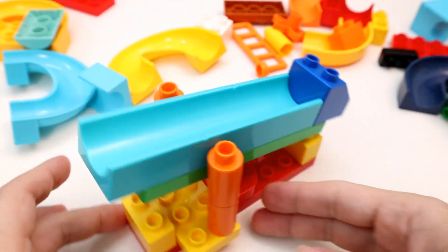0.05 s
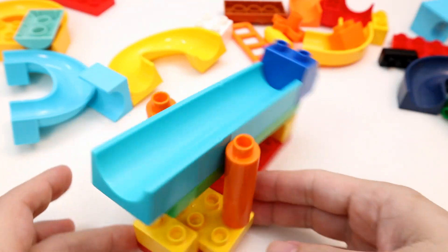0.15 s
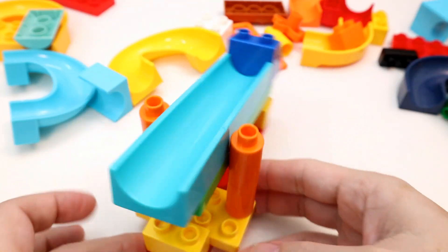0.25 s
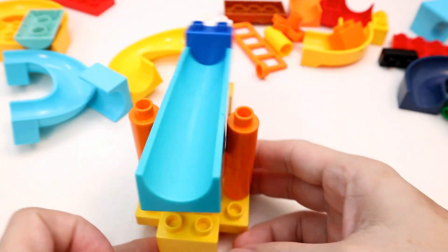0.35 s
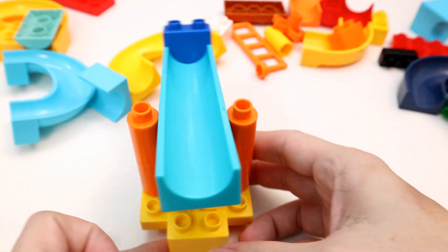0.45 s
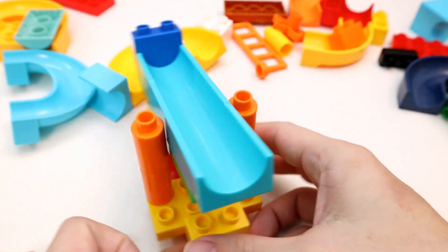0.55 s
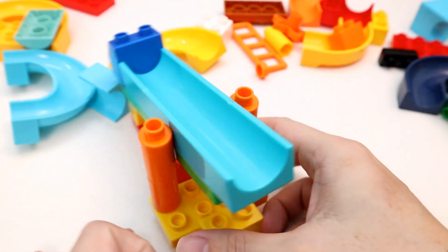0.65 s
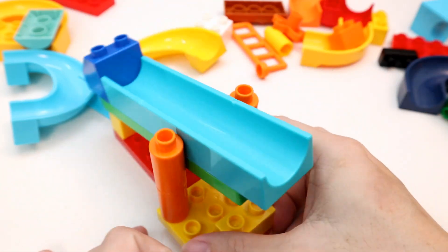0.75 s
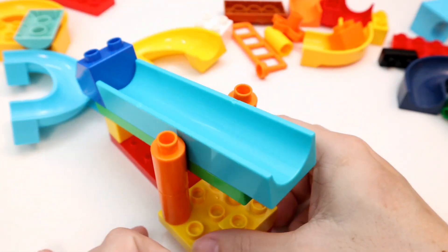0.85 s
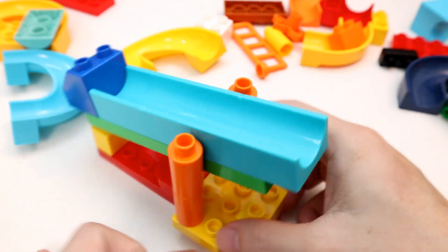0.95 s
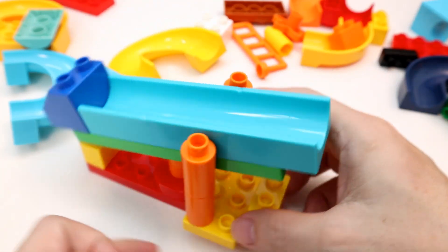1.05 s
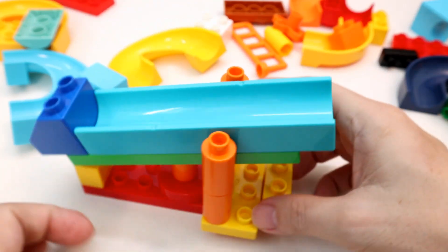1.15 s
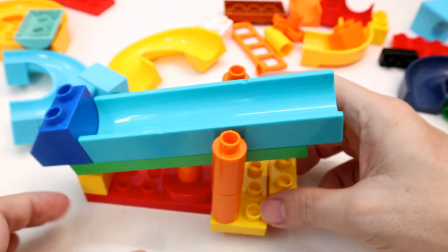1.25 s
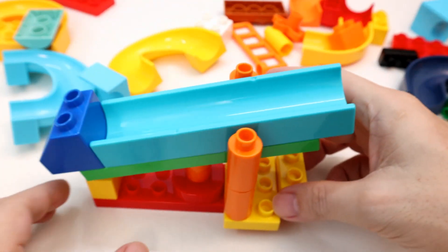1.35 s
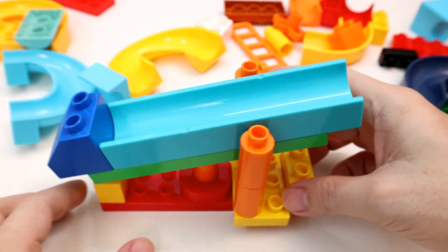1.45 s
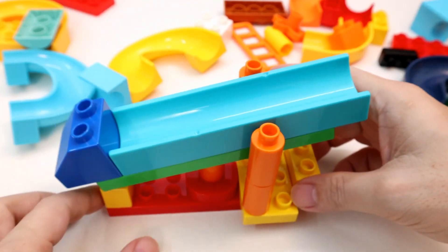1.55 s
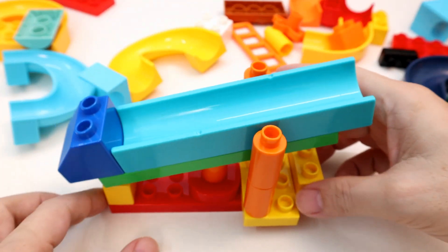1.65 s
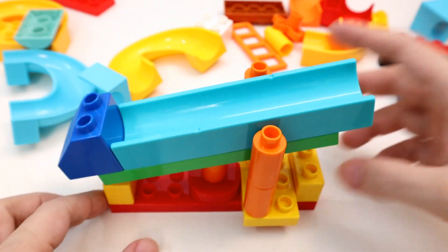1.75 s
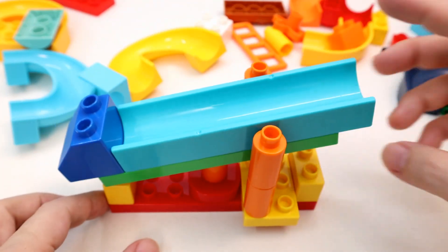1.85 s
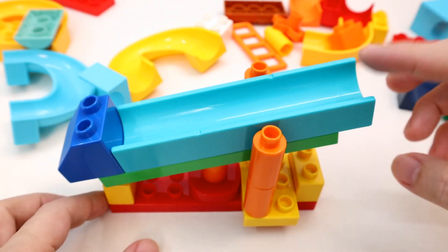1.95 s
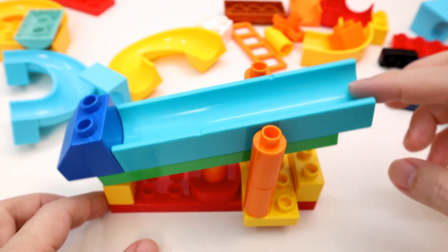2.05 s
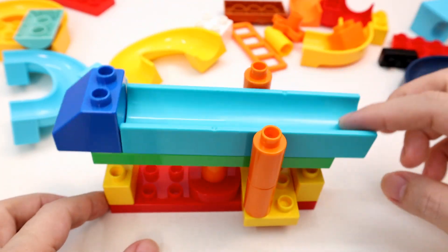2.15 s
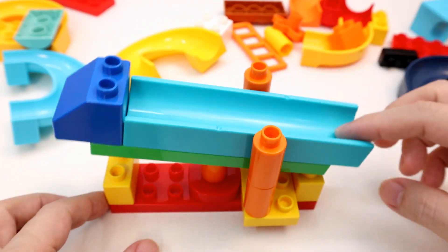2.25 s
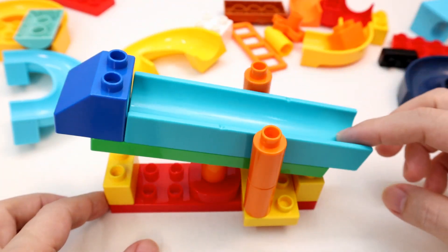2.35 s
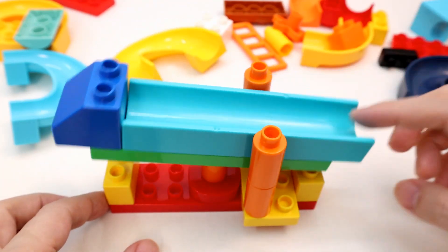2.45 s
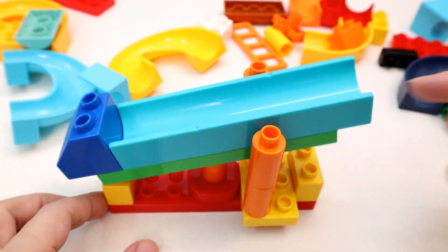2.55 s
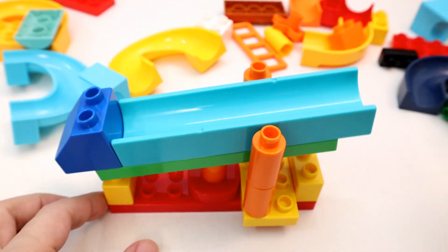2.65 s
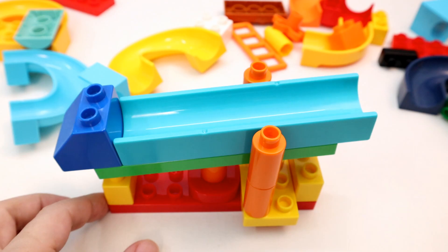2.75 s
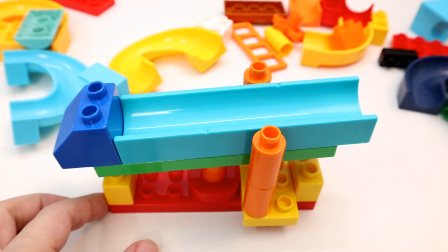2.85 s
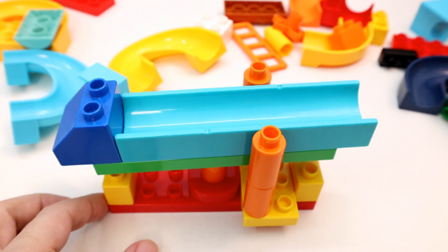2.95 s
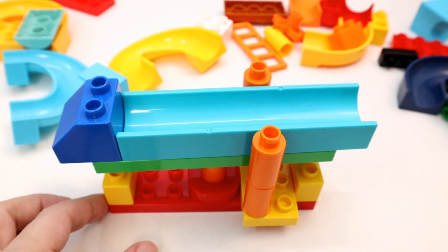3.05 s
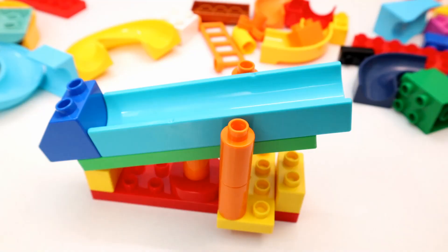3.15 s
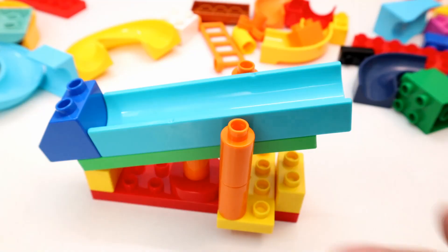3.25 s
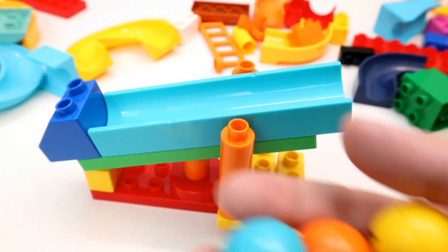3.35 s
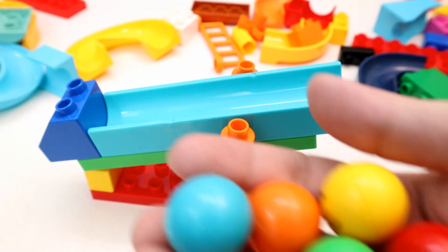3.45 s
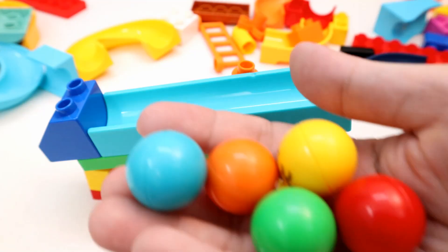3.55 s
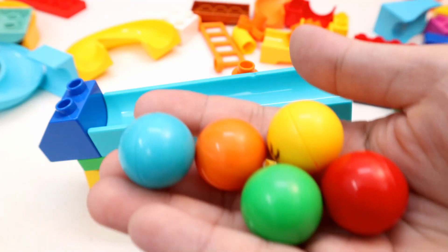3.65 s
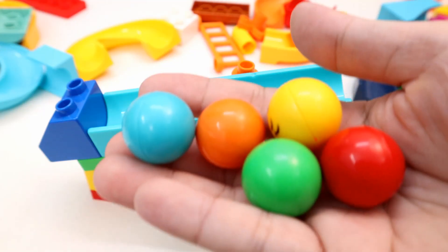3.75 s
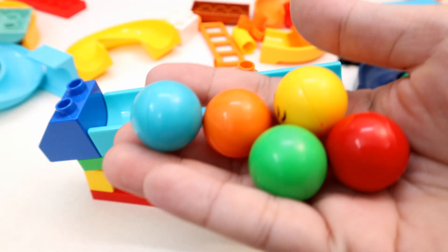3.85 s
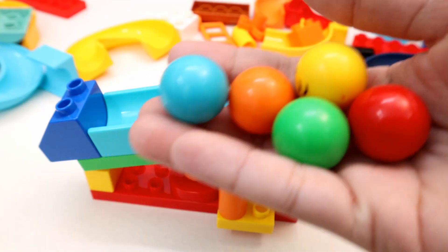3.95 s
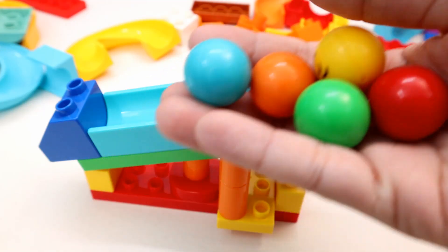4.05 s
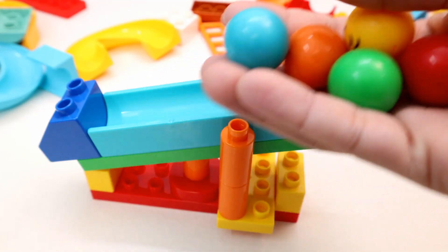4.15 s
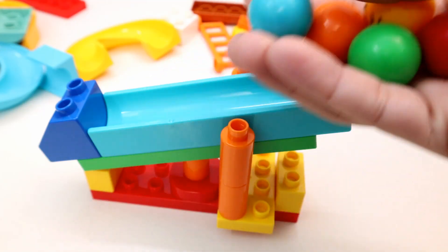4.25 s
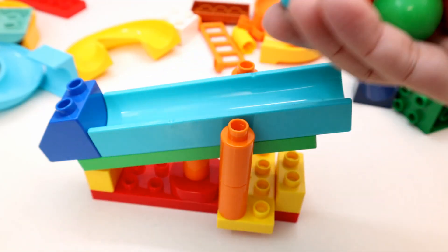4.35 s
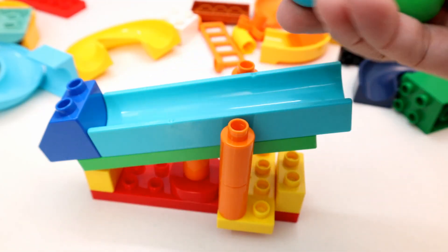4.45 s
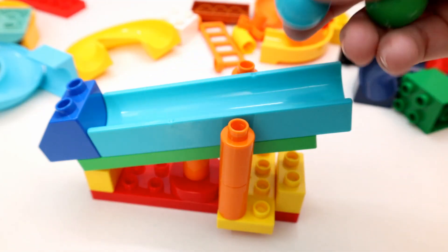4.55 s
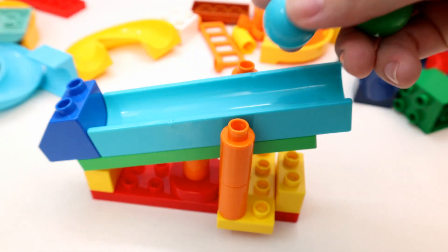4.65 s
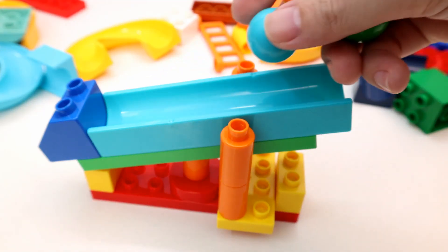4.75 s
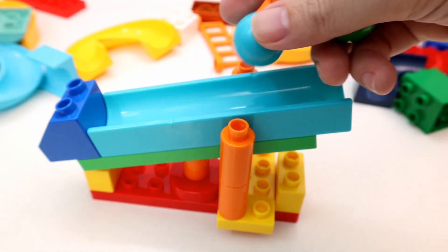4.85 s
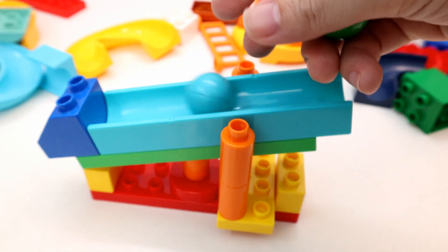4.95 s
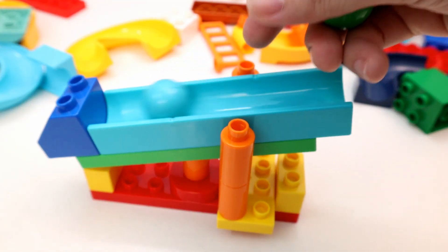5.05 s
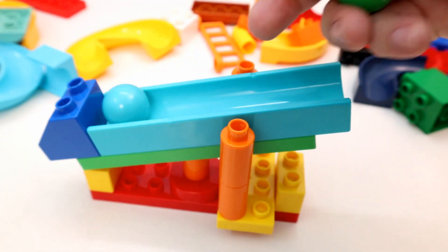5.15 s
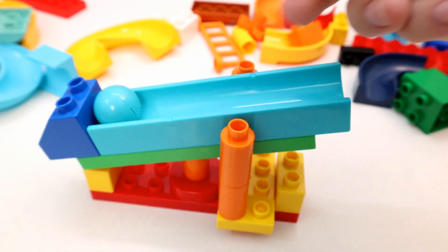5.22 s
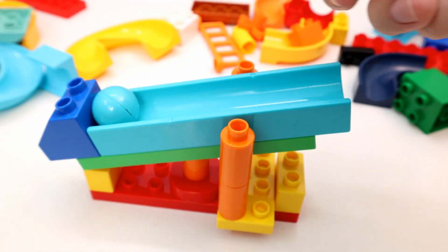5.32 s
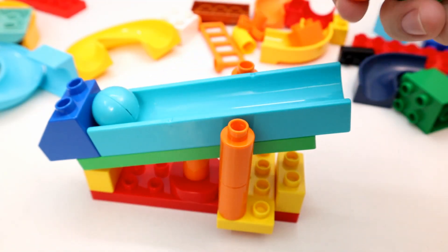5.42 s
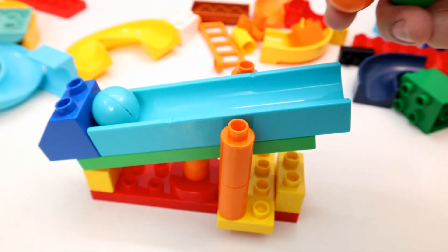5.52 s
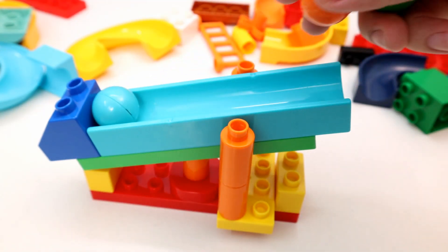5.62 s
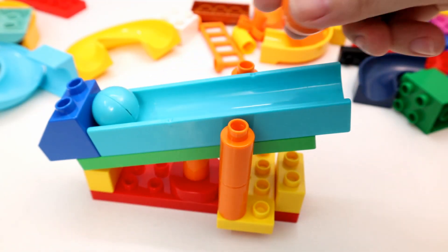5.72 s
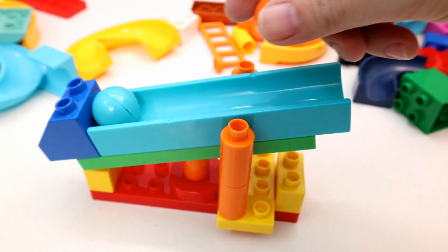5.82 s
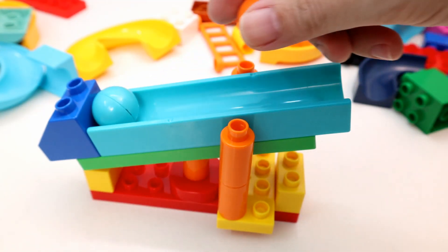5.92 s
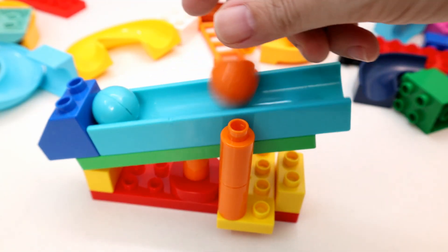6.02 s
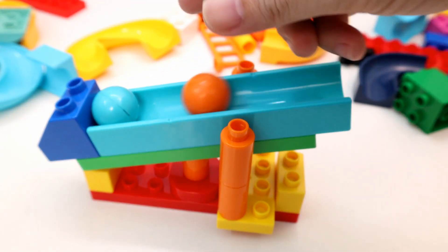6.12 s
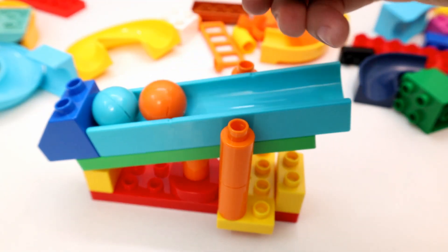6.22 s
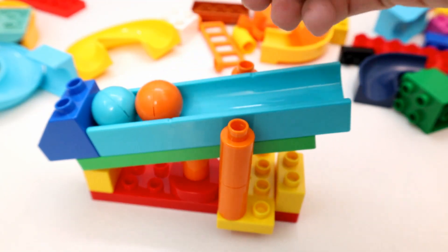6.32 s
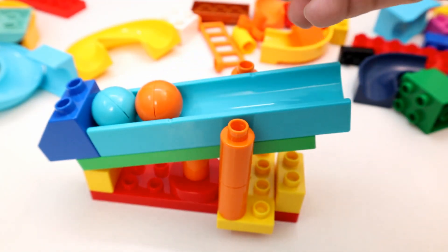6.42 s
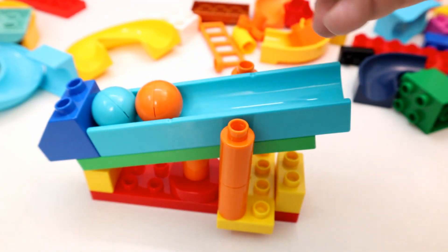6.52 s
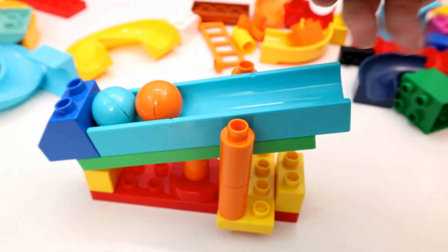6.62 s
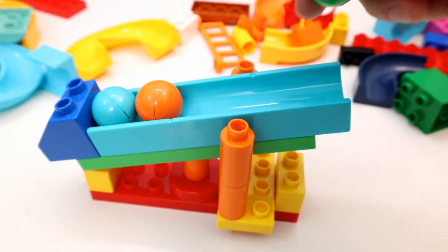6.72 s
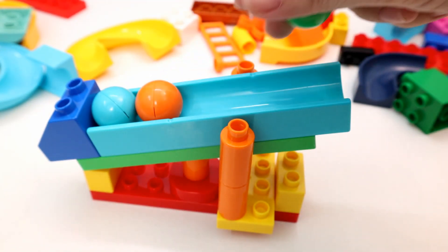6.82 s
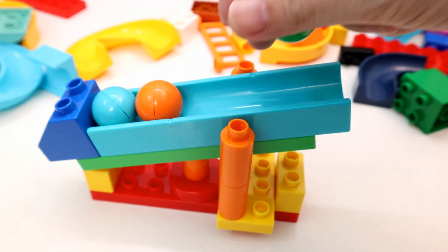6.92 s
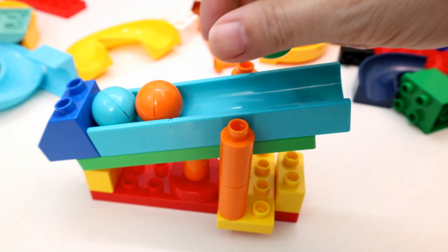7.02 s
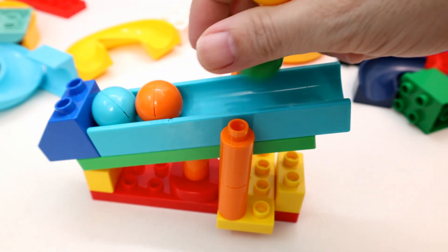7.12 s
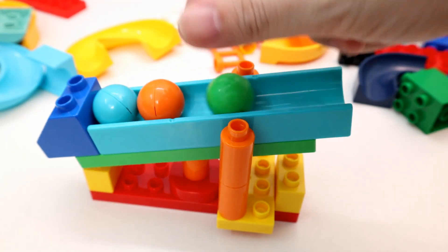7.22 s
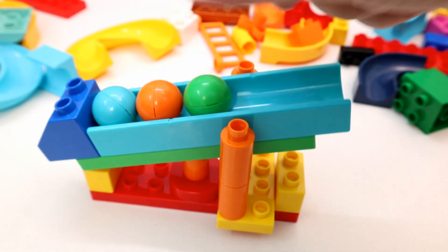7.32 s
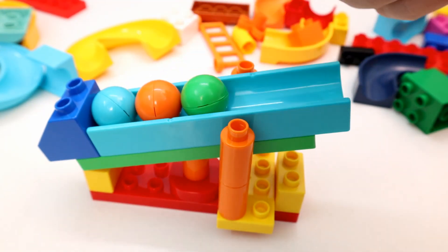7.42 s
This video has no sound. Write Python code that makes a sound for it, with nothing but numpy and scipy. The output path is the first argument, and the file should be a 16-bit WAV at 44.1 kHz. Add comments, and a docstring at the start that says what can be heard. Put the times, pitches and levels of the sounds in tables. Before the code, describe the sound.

A plastic block seesaw is turned on a table, its base scraping with a brief high squeal. Light knocks and faint creaks follow, then a few sharper clacks as the chute tips. After a quiet pause, three hollow plastic balls drop into the chute about a second apart, each bouncing with a bright, rattling clatter. The sound is close, in a small quiet room with faint hiss and low rumble.

```python
"""A small quiet room, at a table: a hand turns a plastic block seesaw and tips its chute.
The base scrapes by friction and squeals by stick-slip; blocks knock, fingers and joints creak.
Then hollow balls drop into the chute, bounce, roll and knock together, their shells ringing.
Each blow cracks, rings the chute, thumps the table and rattles the loose joints.
Near walls add a short tail; room hiss and a low rumble lie underneath."""
import sys
import numpy as np
from scipy import signal
from scipy.fft import rfft, irfft
from scipy.io import wavfile
from scipy.ndimage import uniform_filter1d

SR = 44100
rng = np.random.default_rng(int(sys.argv[2]) if len(sys.argv) > 2 else 0)


def dump(signal):
    """Clip the signal to [-1, 1] and save it as 16-bit WAV at the path in sys.argv[1]."""
    limited = np.clip(np.atleast_2d(signal).T, -1, 1)
    pcm = np.round(limited * 32767).astype(np.int16)
    wavfile.write(sys.argv[1], SR, pcm)


N = 329859


def undb(db):
    """dB to gain."""
    return 10 ** (np.asarray(db) / 20)


def unit_rms(x):
    """Scale to rms 1."""
    return x / np.sqrt(np.mean(x ** 2))


def curves(rows):
    """Table columns, linearly interpolated over time."""
    time_s, *columns = np.transpose(rows)
    return [np.interp(np.arange(N) / SR, time_s, column) for column in columns]


def colour(x, points):
    """Filter by (freq_hz, gain_db) points."""
    hz, db = np.transpose(points)
    n = x.shape[-1]
    bins_hz = np.maximum(np.arange(n // 2 + 1) * SR / n, 1)
    return irfft(rfft(x) * undb(np.interp(np.log(bins_hz), np.log(hz), db)), n)


def band(x, hz, width_hz):
    """Resonator applied twice; unity gain at centre."""
    b, a = signal.iirpeak(min(hz, SR / 2.5), hz / width_hz, fs=SR)
    return signal.lfilter(b, a, signal.lfilter(b, a, x))


def wander(rate_hz):
    """Smoothed random steps, rms 1."""
    hold = int(SR / rate_hz)
    steps = np.repeat(rng.standard_normal(N // hold + 1), hold)
    return unit_rms(uniform_filter1d(uniform_filter1d(steps, hold), hold)[:N])


def panned(x, pan_db):
    """Stereo; pan_db is left minus right."""
    return x * undb(np.array([[pan_db], [-pan_db]]) / 2)


def add_at(out, start_s, x):
    """Mix x into out from start_s."""
    start = int(start_s * SR)
    span = out[..., start:start + x.shape[-1]]
    span += x[..., :span.shape[-1]]


# freq_hz, density_db
AIR_SPECTRUM = [(53, -33.5), (90, -5.5), (111, -6), (130, -10), (190, -10), (221, -9.5), (251, -8),
                (325, -14.5), (532, -16.5), (870, -22), (2650, -27), (12100, -48.5), (15000, -77.5)]
# Stereo width of the air: freq_hz, side_minus_mid_db
AIR_WIDTH = [(60, -21.5), (110, -11.5), (200, -5.5), (380, -0.5), (690, 3), (1280, 4.5), (2360, 2.5),
             (4360, 5), (8040, 4), (14800, -10.5)]


def air(level_db=-55):
    """Steady room hiss and hum, wider in the treble."""
    mid, side = colour(rng.standard_normal((2, N)), AIR_SPECTRUM)
    side = colour(side, AIR_WIDTH)
    return np.array([mid + side, mid - side]) * undb(level_db) / mid.std()


# Hand and table rumble: time_s, level_db
RUMBLE_LEVELS = [(0.0, -51), (.58, -61), (1.56, -56.5), (2.25, -50.5), (2.44, -62), (2.79, -45),
                 (2.91, -57), (3.25, -57.5), (3.55, -50), (3.8, -56.5), (4.23, -53.5), (4.6, -59),
                 (5.1, -58.5), (5.27, -47), (5.4, -63), (6.06, -57), (7.23, -57.5), (7.48, -46)]


def rumble():
    """Low noise from hands and table."""
    noise = band(rng.standard_normal(N), hz=62, width_hz=50)
    return unit_rms(noise) * undb(curves(RUMBLE_LEVELS)[0])


# Base sliding on the table: time_s, scrape_db, body_db
DRAG_LEVELS = [(0.0, -50.5, -54), (.06, -53, -46.5), (.24, -49.5, -57), (.28, -35.5, -37),
               (.35, -38, -36.5), (.44, -32, -43.5), (.57, -41, -48), (.86, -51, -50), (.95, -53.5, -70),
               (1.005, -79, -77), (1.025, -50, -44.5), (1.22, -55, -48.5), (1.31, -57.5, -50),
               (1.6, -46.5, -46.5), (1.75, -54.5, -50.5), (1.87, -73, -51.5), (2.01, -68.5, -60),
               (2.1, -84, -58)]
# Base resonances, three ranges: freq_hz, width_hz, gain_db
BODY_BANDS = [(259.2, 60, 5), (510, 100, -2), (990, 610, -11), (1430, 90, -2), (832.3, 2130, -3.5)]
SCRAPE_BANDS = [(2370, 120, -5), (2600, 330, 6.5), (2980, 388, -3), (3755, 320, -8.5), (2630, 2200, -7)]
HISS_BANDS = [(4800, 1500, 5.5), (6500, 2700, -9.5), (9515, 4400, -13)]


def drag(hiss_db=-16.5):
    """Gritty friction excites the base; resonances come and go as the grip moves."""
    scrape_db, body_db = curves(DRAG_LEVELS)
    layers = [(scrape_db, SCRAPE_BANDS), (body_db, BODY_BANDS), (scrape_db + hiss_db, HISS_BANDS)]
    out = np.zeros(N)
    for level_db, bands in layers:
        grit = rng.standard_normal(N) * undb(2 * rng.exponential(size=N) + 2.58 * wander(44))
        base = sum(undb(db + 2.2 * wander(18)) * band(grit, hz, width) for hz, width, db in bands)
        out += undb(level_db) * unit_rms(base)
    sliding = np.clip((DRAG_LEVELS[-1][0] - np.arange(N) / SR) / 0.033, 0, 1)
    return out * sliding


def ring(modes, t, scatter_db, detune, attack_s):
    """Struck modes, peak 1; strengths vary with where the blow lands."""
    hz, db, t60_s = np.transpose(modes)[:, :, None]
    level_draw, pitch_draw = rng.standard_normal((2, len(modes), 1))
    envelopes = undb(db + scatter_db * level_draw - 60 * t / t60_s)
    partials = envelopes * np.sin(2 * np.pi * hz * (1 + detune * pitch_draw) * t)
    x = partials.sum(0) * (1 - np.exp(-t / attack_s))
    return x / np.abs(x).max()


# Loose joints: freq_hz, density_db
RATTLE_SPECTRUM = [(88, -38.5), (150, -7.5), (252, -1.5), (601, -0.5), (687, 3), (818, -4.5), (883, 2),
                   (1130, 1), (1870, -5.5), (5100, -28.5), (15000, -60)]


def rattle(t, noise, chute, ring_db, snap_db, t60_s=0.34):
    """Joints chatter in bursts and ring the chute anew; more treble snap gives a brighter rattle."""
    bursts, drive = rng.standard_normal((2, len(t)))
    chatter = undb(2.76 * unit_rms(uniform_filter1d(bursts, size=90)))
    rung = unit_rms(signal.fftconvolve(drive, chute * undb(-60 * t / 0.069))[:len(t)])
    joints = unit_rms(colour(noise, RATTLE_SPECTRUM)) + undb(-3 + 0.83 * ring_db) * rung
    tilt = [(1000, 0.0089), (10000, 0.9 * (snap_db + 29.5))]
    envelope = undb(-60 * t / t60_s) * np.minimum(t / 0.0014, 1)
    return colour(joints * chatter, tilt) * envelope


# Chute and table modes: freq_hz, level_db, t60_s
CHUTE_MODES = [(868, -16.5, 0.096), (1200, -18, 0.068), (1290, -4, 0.036), (1556, -9, 0.022),
               (1743, -13, 0.031), (1830.4, -4, .11), (1870, -0.5, 0.081), (2136, -8, 0.19),
               (2680, -4.5, 0.061), (2850, -5.5, 0.047), (3556, -11, 0.035), (4080, -15, .05),
               (5147, -12.5, 0.036), (5844, -26.5, 0.046)]
TABLE_MODES = [(70, -10, 0.07), (100, -1.5, 0.15), (159.5, -11.5, 0.15), (246.1, -0.5, 0.22),
               (289.1, -7.5, 0.32), (339, -8, 0.26), (462.5, -2.5, 0.084), (669.4, -9.5, 0.097)]


def contact(t, crack_hz, thump_db, snap_db, ring_db, damping, snap_hz, rattle_db):
    """One blow: crack, treble snap, chute ring, joint rattle, table thump."""
    mono_noise = rng.standard_normal(len(t))
    stereo_noise = rng.standard_normal((2, len(t)))
    snap_hz *= 1 + 0.091 * rng.standard_normal()
    impulse = (t == 0) * 1.2
    crack = band(impulse + mono_noise * np.exp(-t / 0.0012), crack_hz, 0.96 * crack_hz)
    snap = band(impulse + stereo_noise * np.exp(-t / 0.0054), snap_hz, 0.48 * snap_hz)
    snap *= undb(snap_db) / np.abs(snap).max()
    chute = ring(CHUTE_MODES, t, scatter_db=5, detune=0.006, attack_s=0.0007)
    joints = undb(rattle_db) * rattle(t, mono_noise + 0.46 * stereo_noise, chute, ring_db, snap_db)
    thump = undb(thump_db) * ring(TABLE_MODES, t, scatter_db=4.5, detune=0.043, attack_s=0.0012)
    choke = undb(-60 * t * damping / 0.04)  # a resting ball or hand cuts the ring short
    return crack / np.abs(crack).max() + choke * (undb(ring_db) * chute + joints + snap) + thump


# Block knocks: start_s, level_db, crack_hz, thump_db, snap_db, ring_db
BLOCK_BLOWS = [(0.027, -24.5, 1140, -3.5, -34.5, -11), (0.035, -28, 970, -15, -32.5, -0.5),
               (0.102, -29.5, 735, -19, -21, -15), (0.265, -20, 2400, -9, -1, -12),
               (0.287, -13, 1330, -25.5, -35.5, -1), (0.295, -15, 1940, -13.5, -34.5, -11),
               (0.36, -15.5, 2600, -19.5, -25.5, -1.5), (0.534, -28, 2370, -32.5, -24, 8.5),
               (1.03, -32.5, 940, -27, -25, -13), (1.051, -35.5, 1060, -1, -18, -7),
               (1.176, -24, 865, -9, -40, -12), (1.22, -21.5, 2830, -24, -5, -2.5),
               (1.248, -26.5, 784, -13.5, -41, -17), (1.584, -35.5, 2610, -8.5, -2, -18),
               (1.729, -32, 1870, -2.5, -20, 0.5), (1.826, -32, 780, -4.5, -35, -23),
               (1.86, -37.5, 1075, 9.5, -29, -8), (1.916, -27.5, 830, -12, -66, -27),
               (1.954, -31.5, 890, -4.5, -42, -26), (2.005, -41, 1784, -1, -28, 10.5),
               (2.208, -30, 2070, -6.5, -16, -3), (2.248, -38, 2790, -3.5, -12, -5),
               (2.278, -29.5, 605, 7.5, -23, -4.5), (2.446, -16, 2770, -5.5, -38.5, -4),
               (2.653, -19.5, 1760, 3.5, -15.5, -10), (2.669, -20.5, 1430, -4.5, -9, -6),
               (2.703, -1.5, 2250, -17, -13.5, -11.5), (2.736, -10.5, 665, -6, -11, -1.5),
               (3.164, -54.5, 604, 11, -27, -6), (3.243, -53, 935, 2, -24, -12),
               (4.153, -47, 2590, -18, -11, -7), (4.281, -47.5, 940, -6, -14.5, -8),
               (4.948, -47, 1503, -8, -18, -7), (5.725, -49.5, 890, -6, -21, 1)]
# Dulling by the hand: freq_hz, gain_db
BLOCK_EQ = [(3000, -0.5), (6000, -2), (12000, -9.5)]


def blocks():
    """Hand-held blocks knock as the toy is turned and tipped."""
    t = np.arange(int(0.4 * SR)) / SR
    out = np.zeros((2, N))
    for start_s, level_db, crack_hz, thump_db, snap_db, ring_db in BLOCK_BLOWS:
        knock = contact(t, crack_hz, thump_db, snap_db, ring_db,
                        damping=0.31, snap_hz=3700, rattle_db=-11)
        add_at(out, start_s, panned(undb(level_db) * knock, pan_db=rng.normal(-0.15, 1)))
    return colour(out, BLOCK_EQ)


# Base squeal: time_s, pitch_hz, level_db
SQUEAL_PATH = [(.3, 2540, -39), (.326, 2550, -27.5), (.36, 2605, -13), (.374, 2580, -29.5),
               (.398, 2520, -37), (.41, 2525, -19), (.454, 2548, -8.5), (.47, 2510, -20.5),
               (.48, 2510, -15.5), (.497, 2490, -25.5), (.52, 2480, -40), (.548, 2480, -46),
               (.558, 2500, -20.5), (.568, 2480, -44), (.6, 2450, -55)]


def squeal(neighbour_db=-13.5):
    """Stick-slip locks on a base mode, grows and slips free; a lower mode beats with it."""
    t = np.arange(N) / SR
    pitch_hz, level_db = curves(SQUEAL_PATH)
    gripping = np.clip(np.minimum(t - SQUEAL_PATH[0][0], SQUEAL_PATH[-1][0] - t) / 0.01, 0, 1)
    phase = 2 * np.pi * np.cumsum(pitch_hz + 18 * wander(120)) / SR
    rasp = wander(500)  # uneven slips smear the overtones
    overtones = rasp * (undb(-31) * np.sin(2 * phase) + undb(-48.5) * np.sin(3 * phase))
    neighbour = undb(neighbour_db) * np.sin(0.925 * phase)
    envelope = np.sqrt(2) * gripping * undb(level_db + 1.2 * wander(170))
    return panned(envelope * (np.sin(phase) + neighbour + overtones), pan_db=3.7)


# Finger and joint creaks: start_s, length_s, pitch_hz, level_db
CREAK_EVENTS = [(1.06, 0.039, 1200, -59), (1.35, 0.044, 487, -45.5), (1.495, .042, 993, -43),
                (1.697, 0.026, 924, -46.5), (1.806, 0.035, 730, -45.5), (1.838, 0.038, 1050, -44),
                (2.025, 0.028, 1860, -55)]


def creaks(slips_per_s=260):
    """Uneven slips briefly ring a small resonance."""
    t = np.arange(int(0.08 * SR)) / SR
    out = np.zeros(N)
    for start_s, length_s, pitch_hz, level_db in CREAK_EVENTS:
        chance, strength = rng.random((2, len(t)))
        slips = (chance < slips_per_s / SR) * (0.34 + strength) + 0.03 * (strength - 0.5)
        creak = unit_rms(band(slips, pitch_hz, 0.25 * pitch_hz))
        gate = np.clip(np.minimum(t, length_s - t) / 0.0042, 0, 1)
        add_at(out, start_s, undb(level_db) * creak * gate)
    return out


# Ball impacts: start_s, level_db, thump_db, snap_db, ring_db, damping_ratio
BALL_BLOWS = [(5.065, -2, -44, 0, 2.5, 1), (5.07, -5.5, -19, -13, -6.5, .3),
              (5.105, -11.5, -22.5, -5, 6, 0.23), (5.116, -3.5, -34.5, -8, 2, 1),
              (5.153, -12.5, -16, -2.5, 6.5, 0.64), (5.19, -16, -9.5, -17, 0.5, 0.04),
              (5.262, -16.5, -22, -13, -8, 0.06), (5.278, -10, -9.5, 0, -12.5, 0.12),
              (5.303, -13, -14.5, -31.5, 1, 0.03), (5.389, -14, -8.5, -1.5, -14, 0.09),
              (5.442, -22.5, -3, -7.5, -9.5, 0.07), (6.197, -0.5, -49.5, -7.5, 0, 1),
              (6.21, -0.5, -29.5, -2.5, -6, 1), (6.222, -9.5, -31.5, -18, 4, 0.5),
              (6.232, -15, -22, -4.5, 2.5, 0), (6.261, -12, -16.5, 1, 2, 0.22),
              (6.274, -14, -14.5, 0, 1.5, 0.65), (6.289, -24, -29, -17.5, 6, 0.5),
              (6.302, -15, -11.5, -14, 1.5, 0.09), (6.382, -7.5, -16.5, -7, -13.5, 0.04),
              (6.463, -19, -6.5, 0.5, -10, 0.2), (7.307, -4, -36.5, -10.5, 2, .35),
              (7.316, -2.5, -32.5, -3, -6, 0.44), (7.324, -10, -33, 0, 5.5, 0.6),
              (7.33, -8.5, -16, -2, 5, .2), (7.353, -15, -4, -7.5, 1.5, 0),
              (7.469, -14.5, -7, -4.5, -3.5, 0)]
# Ball shell modes: freq_hz, level_db, t60_s
SHELL_MODES = [(5500, -1.5, 0.024), (8300, -5, .015), (9950, -5, .018), (10600, -5, .018),
               (12500, -10.5, .015)]


def balls(crack_hz=1800, shell_db=-14):
    """Hollow balls land, bounce and collide in the chute; their shells ring."""
    t = np.arange(int(0.4 * SR)) / SR
    out = np.zeros((2, N))
    for start_s, level_db, thump_db, snap_db, ring_db, damping in BALL_BLOWS:
        hit = contact(t, crack_hz, thump_db, snap_db, ring_db, damping, snap_hz=4360, rattle_db=-17)
        shell = [ring(SHELL_MODES, t, scatter_db=2, detune=0.035, attack_s=0.0004) for _ in "LR"]
        hit += undb(snap_db + shell_db) * np.array(shell)
        add_at(out, start_s, panned(undb(level_db) * hit, pan_db=rng.normal(-0.5, 1.5)))
    return out


# freq_hz, t60_s
TAIL_DECAY = [(150, 0.82), (700, 0.45), (2000, 0.46), (5000, 0.35), (11000, 0.13)]
# Stereo width of the tail: freq_hz, side_minus_mid_db
TAIL_WIDTH = [(100, -22), (500, -12), (2000, -3.5), (8000, 3)]


def room(x, level_db=-8.5):
    """Near walls return a dense tail, dying band by band, widest in the treble."""
    t = np.arange(SR // 2) / SR
    mid, side = rng.standard_normal((2, len(t)))
    side = colour(side, TAIL_WIDTH)
    noise = np.array([mid + side, mid - side])
    tail = sum(band(noise, hz, 1.79 * hz) * undb(-60 * t / t60_s) for hz, t60_s in TAIL_DECAY)
    tail *= np.clip(t / 0.0042 - 0.5, 0, 1)
    tail /= np.sqrt(np.sum(tail ** 2) / 2)
    return undb(level_db) * signal.fftconvolve(x.mean(0)[None], tail, axes=1)[:, :N]


# Small soft plastic, little deep bass or top treble: freq_hz, gain_db
PLASTIC_EQ = [(30, -37.5), (60, -12), (90, -0.5), (5000, 0.5), (9000, 2), (15000, -9.5)]
LEFT_LAG_SAMPLES = 2


def scene():
    """The toy, its reflections, room air and rumble."""
    toy = colour(drag() + blocks() + squeal() + creaks() + balls(), PLASTIC_EQ)
    toy[0] = np.roll(toy[0], LEFT_LAG_SAMPLES)
    return toy + room(toy) + air() + rumble()


def record(dry, cutoff_hz=15400):
    """Clip at full scale, then low-pass."""
    lowpass = signal.ellip(10, 0.2, 90, cutoff_hz, fs=SR, output="sos")
    return signal.sosfilt(lowpass, np.clip(dry, -1, 1))


dry = scene()
out = record(dry)
dump(out)
```